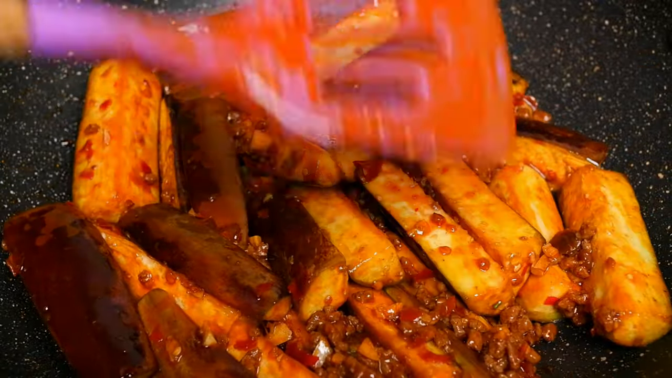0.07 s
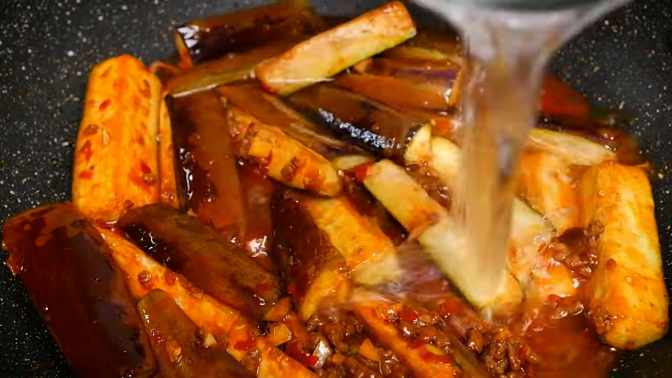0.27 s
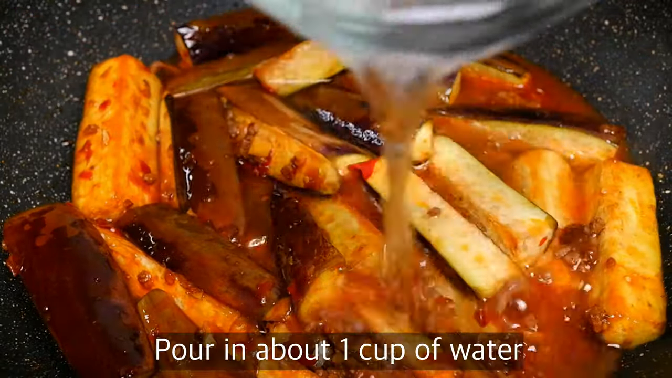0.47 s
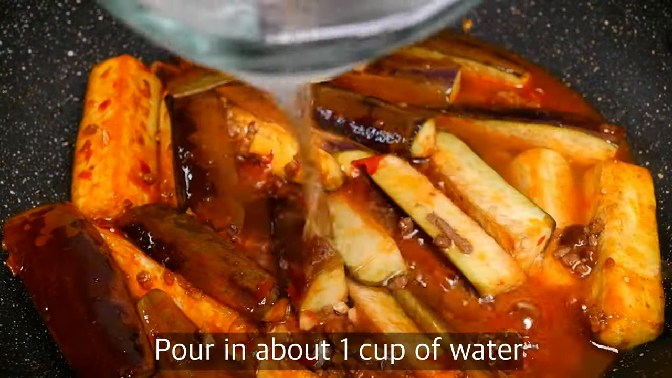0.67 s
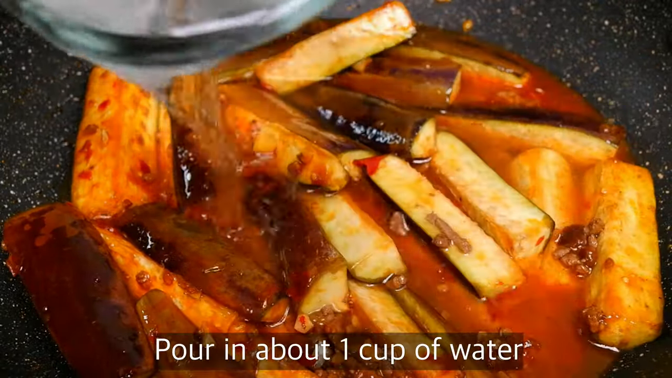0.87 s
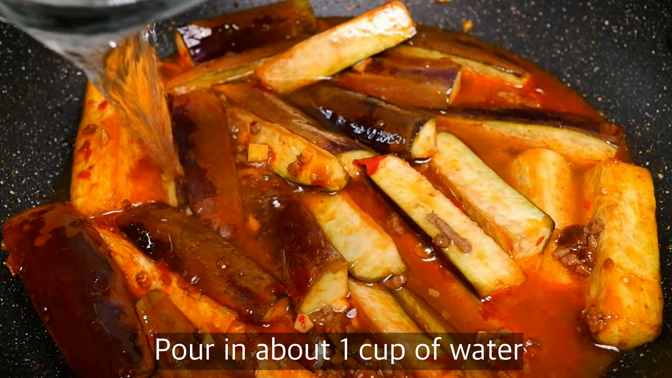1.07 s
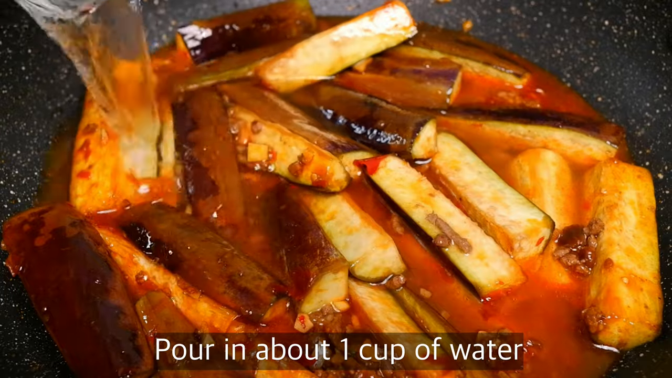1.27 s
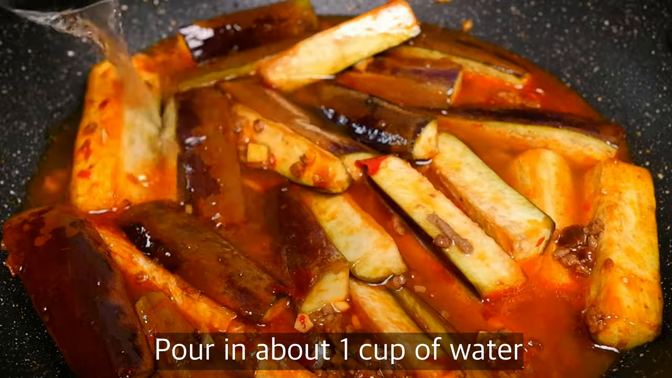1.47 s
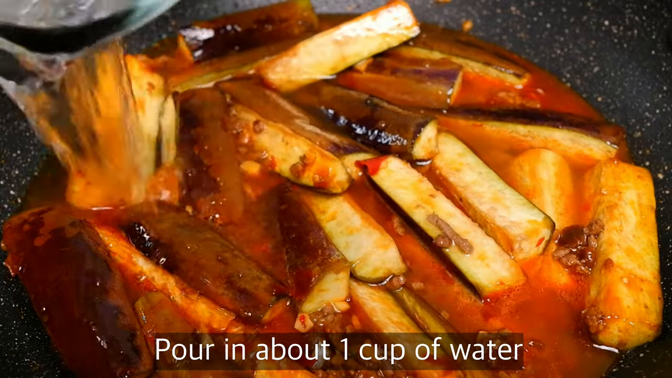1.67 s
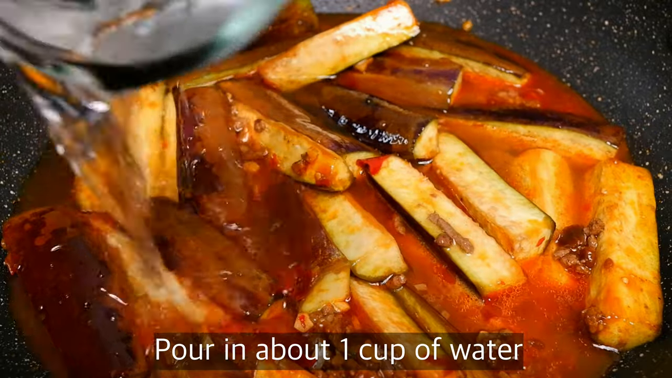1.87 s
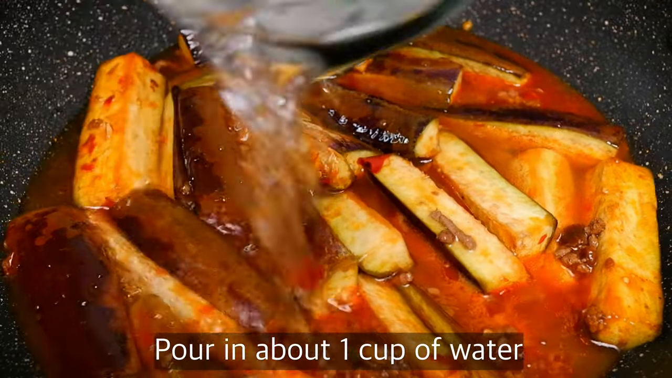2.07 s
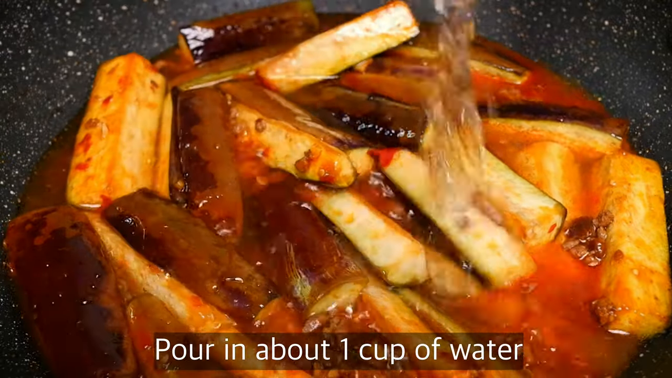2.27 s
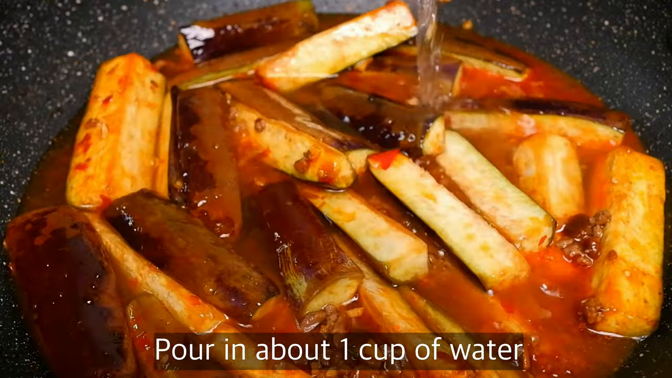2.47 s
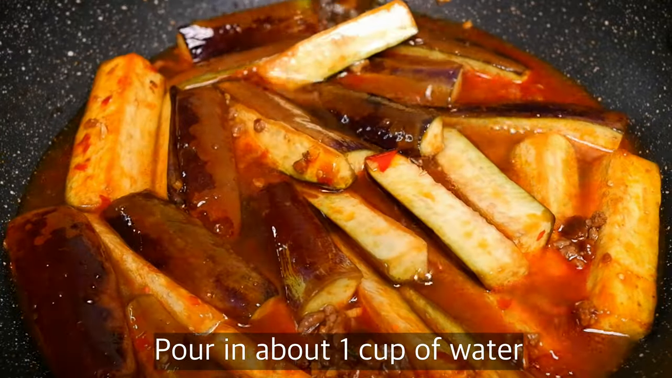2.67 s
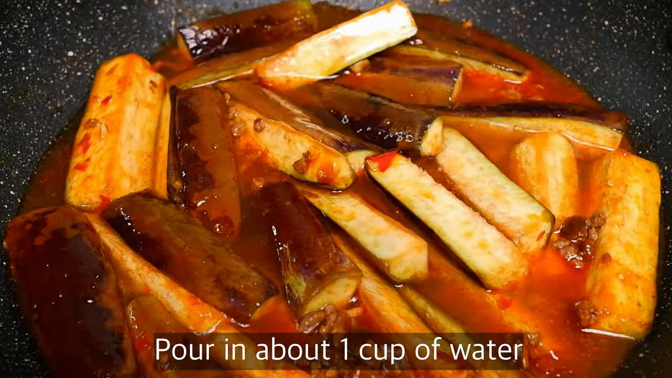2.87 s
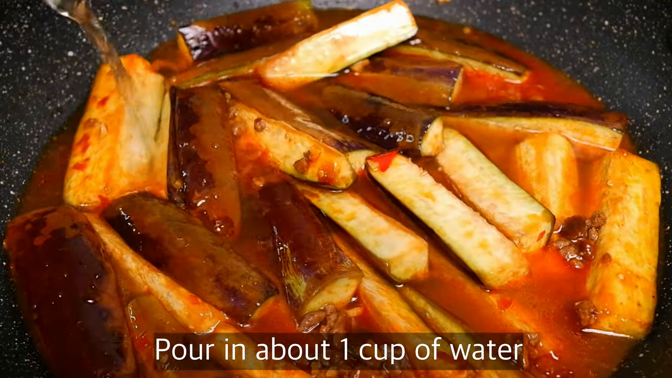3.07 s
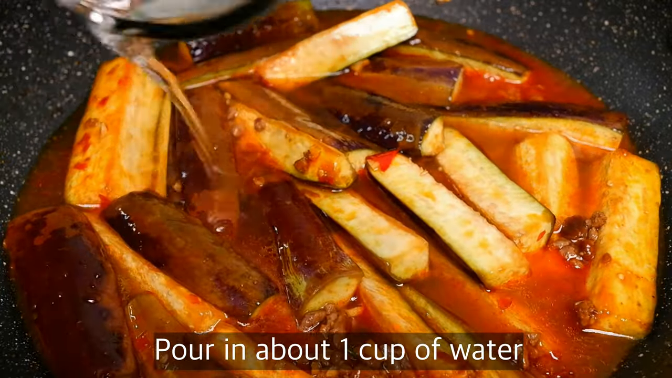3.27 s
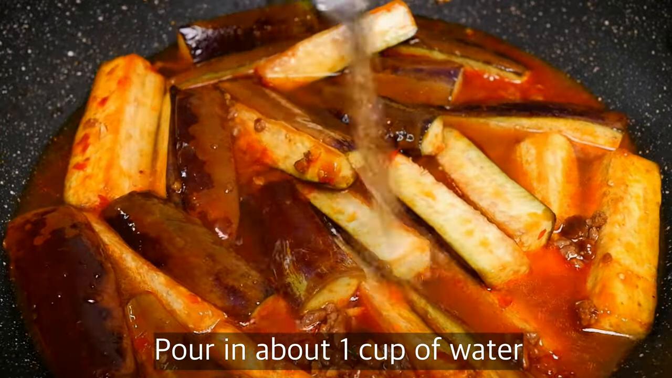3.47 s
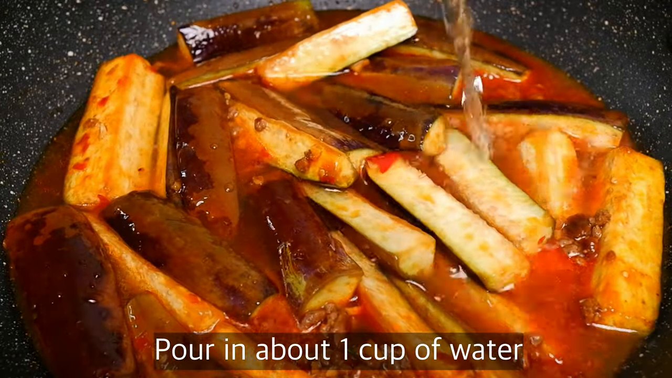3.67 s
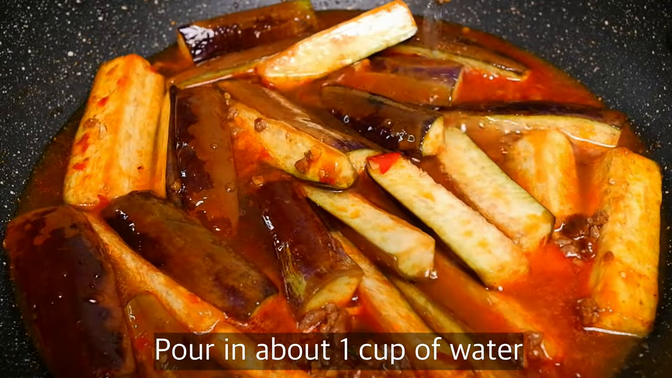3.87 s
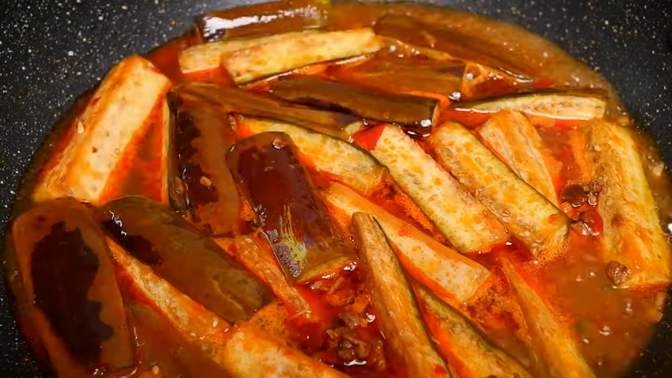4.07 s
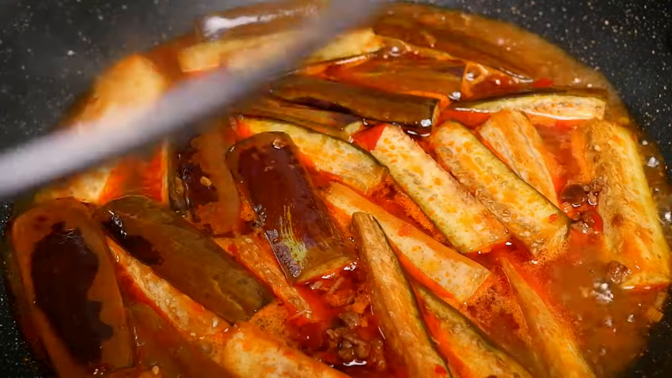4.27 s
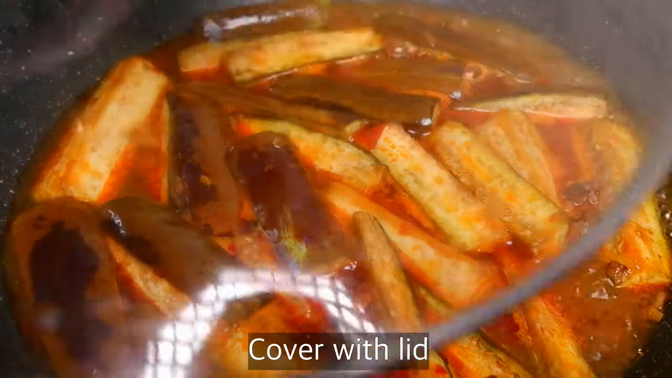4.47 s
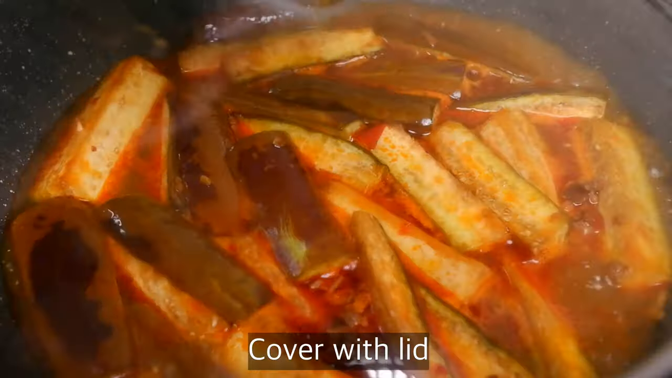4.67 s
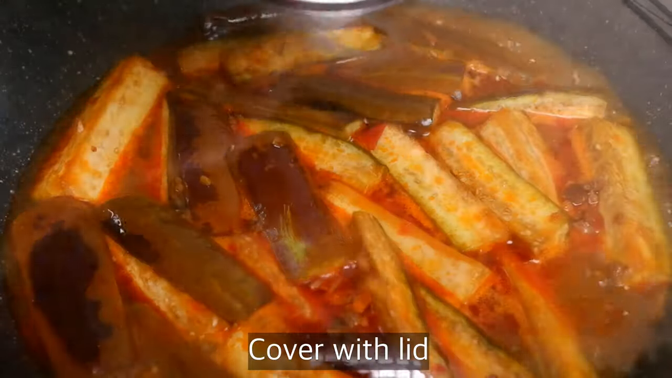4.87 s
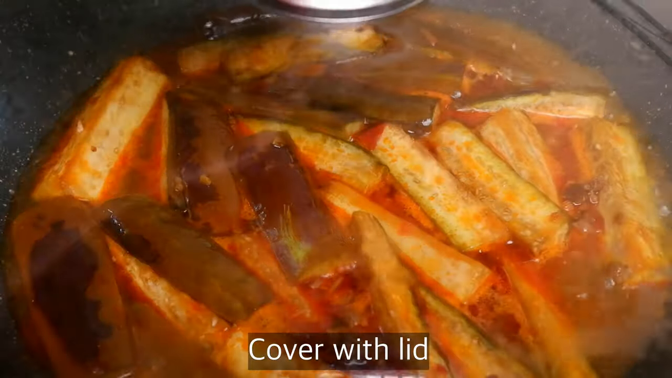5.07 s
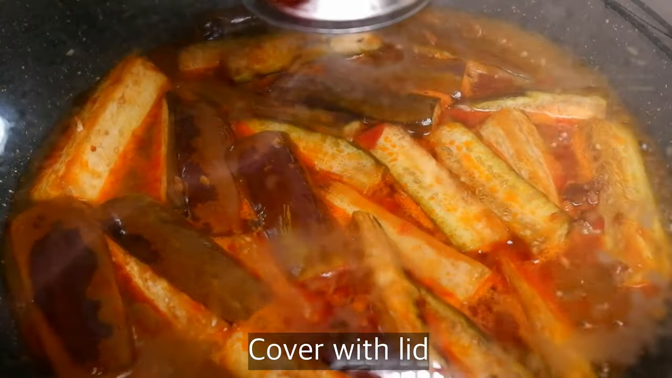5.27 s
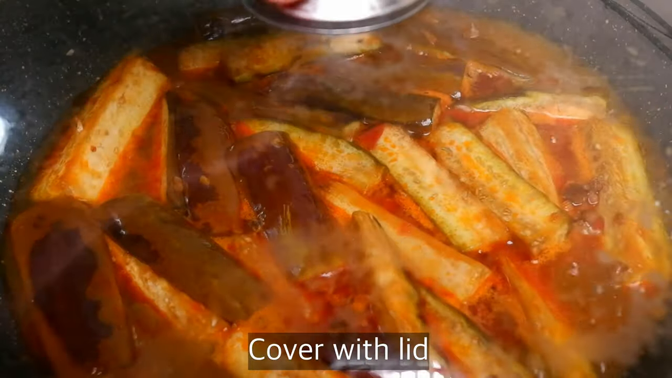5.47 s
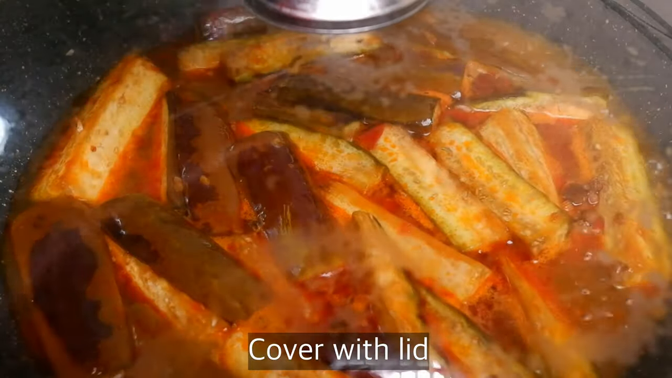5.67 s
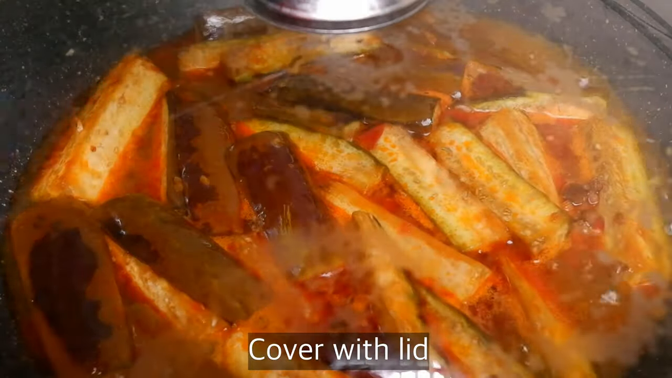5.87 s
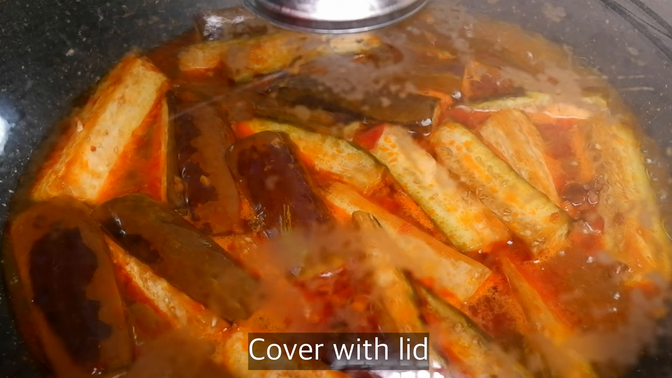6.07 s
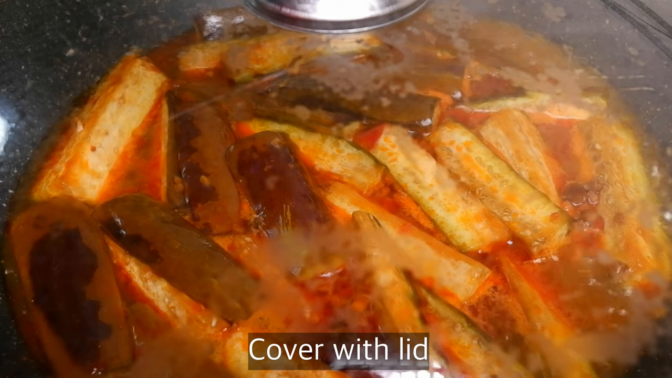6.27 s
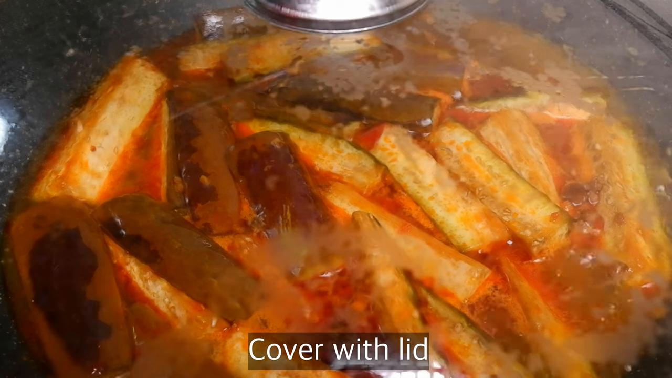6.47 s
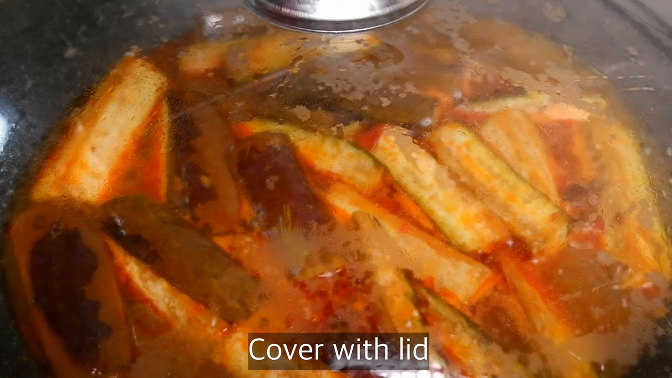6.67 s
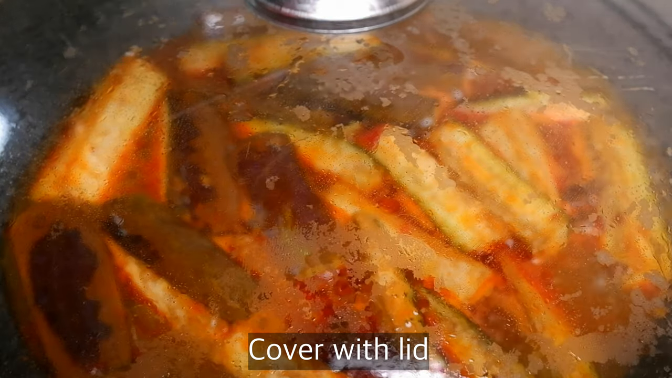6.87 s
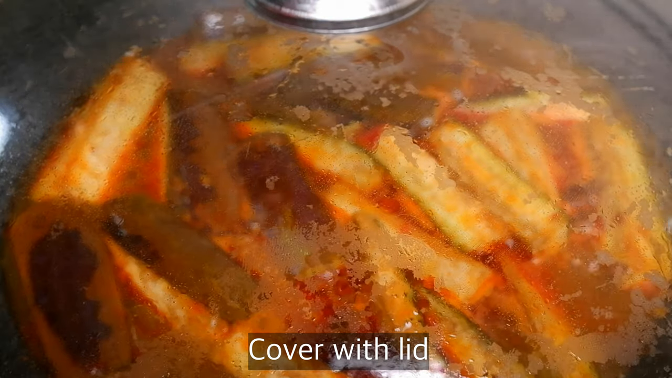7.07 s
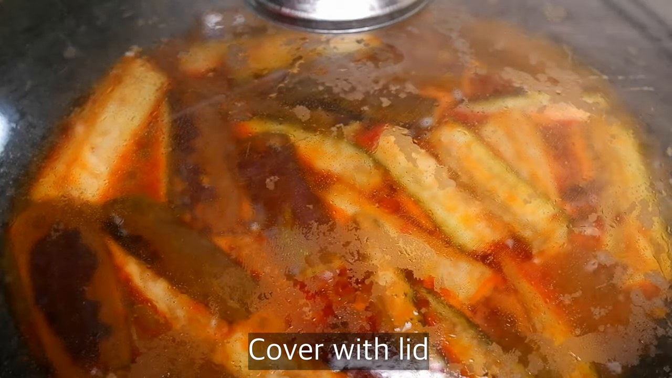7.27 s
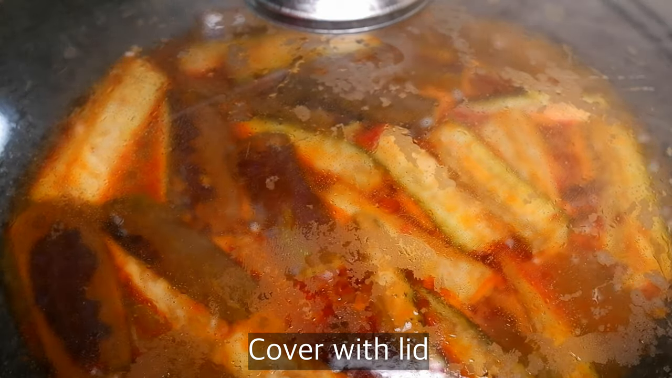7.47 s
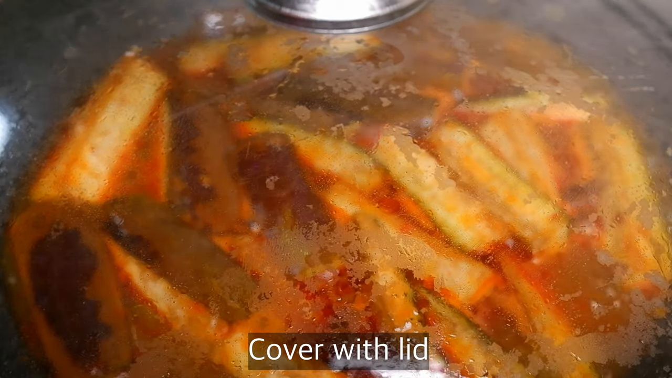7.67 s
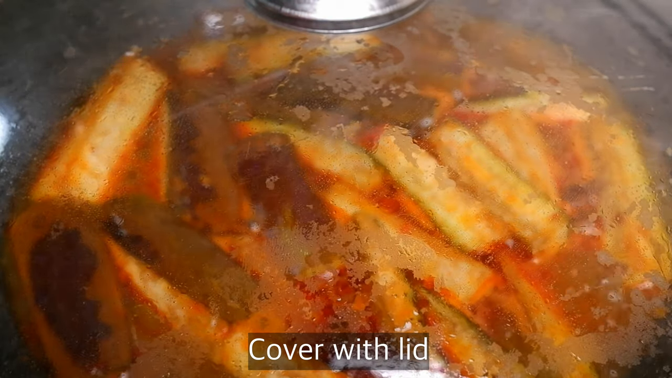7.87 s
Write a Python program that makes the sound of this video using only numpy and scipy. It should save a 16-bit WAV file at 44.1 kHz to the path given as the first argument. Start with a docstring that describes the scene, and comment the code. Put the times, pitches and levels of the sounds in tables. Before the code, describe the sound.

Close up in a small kitchen, food fries in a hot pan with a bright fizz and scattered pops. Poured water splashes and hisses, and the sizzle slowly weakens. About halfway through, it suddenly gives way to softly simmering sauce. A glass lid rattles against the rim and settles with one firm knock, shutting in the fizz. Dull bubbling carries on over the steady hum of a hob fan.

```python
"""Aubergine sizzles in a wok as its water flashes to steam in hot oil, over the hum of the hob's cooling fan.
A cup of water is poured in: it gurgles, raises steam and calms the frying. Then the sauce simmers
while a glass lid knocks on the rim, slides and drops into its seat, shutting in the fizz.
Three moments follow each other abruptly, heard from close by in a small kitchen."""
import sys
import numpy as np
from scipy import signal
from scipy.fft import rfft, irfft
from scipy.io import wavfile

SR = 44100
rng = np.random.default_rng(int(sys.argv[2]) if len(sys.argv) > 2 else 0)


def unload_wav(signal):
    """Save mono or channel-first audio to the path in sys.argv[1] as 16-bit WAV at rate SR, clipped to [-1, 1]."""
    wavfile.write(
        sys.argv[1],
        SR,
        np.round(np.clip(np.atleast_2d(signal).T, -1, 1) * 32767).astype(np.int16),
    )


N = 349708
TIME = np.arange(N) / SR

# jumps to the next moment, first the pouring, then the simmering: (time [s])
JUMPS = [0.300, 4.104]
# tone of the fine fizz: (frequency [Hz], level [dB])
FIZZ_TONE = [(1200, -15.5), (2200, -5), (3200, -3), (4000, -3), (5000, -5.5), (6500, -3), (9500, -5.5),
             (11200, -9.5), (15500, -14)]
# tone of the coarser spitting: (frequency [Hz], level [dB])
SPIT_TONE = [(300, -21.5), (550, -5), (700, -3.5), (880, -0.5), (1050, -1.5), (1300, -1.5), (1750, -2),
             (2200, 1.5), (2900, -6), (5000, -30)]
# hollow ringing of the wok: (pitch [Hz], width [Hz], level [dB])
WOK_RINGS = [(880, 170, -14), (2370, 60, -21), (2935, 30, -10), (3220, 32, -11), (4280, 62, -4),
             (4950, 540, -4.5), (5760, 160, -3), (6320, 45, -6), (8400, 70, -9), (9100, 60, -14),
             (10900, 100, -25)]
# bursting drops and bubbles: (time [s], peak [dB], pitch [Hz], width [share of pitch], fade time [s])
POPS = [(.004, -26, 860, 0.27, 0.0035), (.019, -26, 3500, 1.8, .0015), (.091, -19, 6000, 1.5, .0003),
        (0.189, -21, 6930, 1.3, 0.00042), (.2225, -25, 5000, 2, .0006), (0.286, -14, 2500, 1.8, .0012),
        (0.623, -16.5, 3000, 1.6, 0.0014), (.684, -15, 2400, 3.1, 0.0025), (0.7065, -17.5, 4500, 1.8, .001),
        (.873, -25, 4500, 1.5, .0005), (.960, -28, 1210, 0.72, 0.0069), (1.078, -18.5, 4000, 3.7, 0.0028),
        (1.47, -32, 2000, 1, 0.0055), (1.774, -31, 2050, 0.66, 0.0013), (2.14, -27, 4250, 0.085, 0.0044),
        (2.1704, -19, 1100, 2.6, 0.0016), (2.219, -21.5, 3300, 0.83, 0.0029),
        (2.228, -24.5, 3600, 0.55, 0.0022), (2.265, -25, 3800, 0.3, .0013),
        (2.347, -25.5, 2250, 0.39, 0.0024), (2.472, -27, 2900, 0.46, .0015), (2.492, -33, 1080, 0.33, .005),
        (2.659, -34, 950, 0.7, 0.004), (2.946, -25, 1700, 1.6, .0012), (3.103, -22, 5400, 0.95, 0.00072),
        (3.189, -26, 2350, 0.94, 0.0015), (3.5531, -23, 1260, 2.8, 0.002), (3.555, -28, 7500, 0.7, 0.0017),
        (3.660, -30, 4500, 1.5, .001), (3.678, -37, 2350, 0.16, 0.009), (3.747, -30, 1900, 0.63, .002),
        (3.755, -30, 4200, 0.84, .0006), (3.770, -25, 2800, 1.5, .0004), (3.887, -28.5, 1000, 1.1, 0.0017),
        (4.0259, -12, 6660, 1.5, 0.00076), (4.36, -50, 1180, 0.3, .003), (5.612, -41, 1110, 0.21, 0.0036),
        (5.976, -43, 1090, .3, 0.0037), (6.564, -46, 1110, .3, .003), (7.208, -42, 9450, .25, .004),
        (7.516, -41, 1130, 0.36, .003), (7.767, -41, 1100, 0.16, 0.0033)]
# tone of the fan during the frying: (frequency [Hz], level [dB])
FAN_FRYING_TONE = [(25, -25), (60, -12), (100, -6.5), (145, 3.5), (200, 1.5), (280, -1), (400, -2),
                   (520, -9), (800, -25.5), (2000, -40)]
# tone of the fan during the simmering: (frequency [Hz], level [dB])
FAN_SIMMER_TONE = [(25, -55), (60, -10.5), (110, -7), (155, 2), (240, 2), (350, 0.5), (450, -2.5), (540, 0),
                   (660, -14.5), (900, -15), (2000, -60)]
# the low hum swells once: (time [s], half length [s], level [dB])
HUM_SWELL = [(2.62, 0.25, -48.5)]
# the fan's droning notes during the simmering: (pitch [Hz], width [Hz], level [dB])
FAN_DRONES = [(160.9, 4.6, -59), (243, 16, -57), (291.5, 10.4, -59), (413.4, 9.6, -58.5), (472.5, 8.3, -61)]
# pours from the cup: (start [s], length [s], flow [dB])
POURS = [(0.45, 2.83, 0), (3.41, 0.74, 1)]
# gushes in the stream: (time [s], half length [s], added flow [dB])
GUSHES = [(0.98, 0.052, 10.5), (1.47, 0.067, 1), (2.55, 0.22, -10), (3.15, 0.11, -17)]
# water meets bare hot metal and flares into steam: (time [s], half length [s], strength [dB])
FLARES = [(0.8, 0.34, 2.5), (2.58, 0.49, 0)]
# narrow bands of hiss from the running hob: (pitch [Hz], width [Hz], level [dB])
HOB_HISS = [(5840, 280, -79), (6510, 130, -71), (6870, 140, -62), (7154, 400, -60), (7530, 150, -74),
            (8200, 450, -77)]
# tone of the sauce under the glass: (frequency [Hz], level [dB])
SIMMER_TONE = [(400, -12), (800, -10), (1050, 2), (1200, 2), (1400, -6.5), (1700, -5), (1950, -11),
               (2500, -5.5), (2950, -18), (4000, -19), (5000, -16.5), (8500, -17), (12500, -25.5),
               (15000, -25)]
# bright ticks escape as the lid comes down: (time [s], half length [s], level [dB])
LEAK_TICKS = [(4.75, 0.25, -61)]
# the lid hits the rim; the thump of air tends to get lower as the gap closes:
# (time [s], ring [dB], contact time [ms], crack [dB], thump [dB], thump pitch [Hz])
KNOCKS = [(4.9828, -19.5, 0.12, -27.5, -12.5, 359), (4.9878, -12.5, 0.12, -24.5, -37, 388),
          (5.023, -24, 0.18, -41, -32, 385), (5.164, -26, 0.17, -53, -35, 258),
          (5.1846, -35, 0.15, -42, -18.5, 325), (5.2200, -25, 0.14, -35.5, -21, 363),
          (5.226, -29.5, 0.083, -34, -20, 285), (5.234, -31, 0.11, -41, -38, 250),
          (5.243, -32, 0.22, -40, -29, 235), (5.262, -38, .2, -50, -29, 280),
          (5.271, -22, 0.19, -46, -23, 294), (5.283, -40, 0.23, -47, -26, 250),
          (5.3250, -28, 0.44, -49, -20, 271), (5.352, -38, .3, -49, -23, 215),
          (5.3756, -3, 0.21, -26, -13, 307), (5.3811, -34, 0.3, -32, -15, 213)]
# ringing notes of the lid on the pan: (pitch [Hz], level [dB], time to fade by 60 dB [s])
LID_NOTES = [(163.5, -40, 1), (199.4, -41.5, 1), (289.4, -50, 0.2), (484, -17.5, 0.019), (836, -16, .017),
             (1000, -20, .02), (1130, -42, 0.25), (1159, 0.5, 0.029), (1240, -28.5, 0.29), (1400, -15, .02),
             (1800, -14, .025), (2320, -27, 0.01), (3050, -4.5, 0.016), (4560, -22, .02), (4920, -20, .02)]
# tone of each knock's brief crack: (frequency [Hz], level [dB])
CRACK_TONE = [(400, -20), (1300, 3), (2000, 1.5), (3500, -2), (5000, 0), (9000, -6), (12000, -11),
              (15000, -19)]
# the lid slides, shudders and settles: (start [s], length [s], level [dB])
RUBS = [(4.99, 0.28, -46), (5.22, 0.12, -47), (5.42, 0.074, -50)]
# tone of its dull grinding on the pan: (frequency [Hz], level [dB])
GRIND_TONE = [(90, 10), (160, 3), (290, -2), (450, -3), (650, -4), (820, -4), (1000, -18), (1220, 0),
              (1450, -11), (2000, -16), (3000, -17), (6000, -38), (12000, -46)]
# tone of the kitchen's echo: (frequency [Hz], level [dB])
ECHO_TONE = [(80, -20), (190, 4), (400, 0), (650, -2), (1150, -1), (3000, -2), (12000, -7)]
# tone of the faint hiss that sets left and right apart: (frequency [Hz], level [dB])
FAINT_HISS_TONE = [(30, 5), (700, 10.5), (1300, -2.5), (4000, -6.5), (8000, -23.5), (14000, 6)]


def gain(db):
    """Turn decibels into a number to multiply a sound by."""
    return 10 ** (np.asarray(db) / 20)


def unit(x):
    """Scale a sound so that its average strength (rms) is 1."""
    return x / np.sqrt(np.mean(x ** 2))


def colour(x, tone, size=4096):
    """Filter a sound so that its lows and highs follow a tone table."""
    hz, db = np.transpose(tone)
    outline = np.interp(np.log(np.fft.rfftfreq(size, 1 / SR) + 1), np.log(hz), db)
    # these steps make a filter that never answers before the sound arrives
    cepstrum = irfft(np.log(gain(outline)))
    cepstrum[1:size // 2] *= 2
    cepstrum[size // 2 + 1:] = 0
    return signal.oaconvolve(x, irfft(np.exp(rfft(cepstrum))))[:len(x)]


def resonate(x, hz, width):
    """Let through a band around one pitch; its width is in Hz."""
    return signal.lfilter(*signal.iirpeak(min(hz, SR / 3), hz / min(width, SR / 3), fs=SR), x)


def noise(count=N):
    """White noise: an even hiss."""
    return rng.standard_normal(count)


def wander(per_s):
    """A value that drifts at random, mostly between -1 and 1."""
    steps = noise(4096)
    return np.interp(TIME * per_s, np.arange(len(steps)), steps)


def add(out, at, sound):
    """Mix a short sound in at a time in seconds."""
    start = max(int(at * SR), 0)
    out[start:start + len(sound)] += sound[:max(N - start, 0)]


def held(rows, rise_s, fall_s):
    """A loudness curve that rises, holds and dies away for each row."""
    curve = np.zeros(N)
    for at, length, db in rows:
        rise = np.clip((TIME - at) / rise_s, 0, 1)
        fall = np.exp(-np.maximum(TIME - at - length, 0) / fall_s)
        curve += gain(db) * rise * fall
    return curve


def swells(rows):
    """A loudness curve with one smooth hump for each row."""
    return sum(gain(db) * np.exp(-((TIME - at) / half) ** 2) for at, half, db in rows)


def step(at_s, half_s):
    """A smooth change from 0 to 1 around a moment."""
    return .5 + .5 * np.tanh((TIME - at_s) / half_s)


def crackle(per_s, spread_db, flutter_db):
    """Tiny random clicks: spread makes a few stand out, flutter makes them swell in flurries."""
    clicks = (rng.random(N) < per_s / SR) * np.sign(noise())
    strengths = gain(spread_db * np.minimum(noise(), np.pi))
    return unit(clicks * strengths * gain(flutter_db * wander(70)))


def bubbles(low_hz, high_hz, cycles, spread_db, rise, count):
    """Bubbles ring briefly at random times; rise lifts their pitch as they reach the surface."""
    out = np.zeros(N)
    for when, pitch, strength in rng.random((count, 3)):
        hz = low_hz * (high_hz / low_hz) ** pitch
        age = np.arange(int(2 * cycles * SR / hz)) * hz / SR / cycles
        ring = np.sin(2 * np.pi * cycles * (age + rise * age ** 2 / 2)) * np.exp(-np.pi * age)
        add(out, when * N / SR, ring * gain(-spread_db * np.log(strength + 0.0038)))
    return unit(out)


def flow():
    """How strongly water runs from the cup: about 1 while pouring."""
    return held(POURS, rise_s=0.02, fall_s=0.022)


def heat(oil_db, wet_db, quench_db, cool_db_per_s):
    """Strength of the frying: fierce in oil, calmed by water, then fed by the stream as the pan cools."""
    quenched = step(at_s=0.65, half_s=0.4)
    db = np.where(TIME < JUMPS[0], oil_db, wet_db) - quench_db * quenched - cool_db_per_s * TIME
    starved = 0.19 * quenched * (1 - flow())  # share that stops without fresh water
    return gain(db) * (1 - starved)


def frying():
    """Water flashes to steam in hot oil: fizz, spitting and tiny ringing blisters, coloured by the wok."""
    fine = crackle(per_s=11000, spread_db=4, flutter_db=.8)
    coarse = crackle(per_s=3500, spread_db=2.5, flutter_db=1.3)
    ticks = crackle(per_s=90, spread_db=0, flutter_db=5)
    blisters = bubbles(low_hz=2300, high_hz=10000, cycles=15, spread_db=3.9, rise=0.089, count=4000)
    fizz = unit(colour(fine, FIZZ_TONE)) * gain(0.37) + blisters * gain(-11)
    fizz += unit(colour(ticks, FIZZ_TONE)) * gain(-14)
    fizz *= heat(oil_db=-30, wet_db=-34, quench_db=7.5, cool_db_per_s=0.95)
    fizz *= gain(1.5 * swells(FLARES))
    spit = unit(colour(coarse + 0.75 * fine, SPIT_TONE))
    spit *= heat(oil_db=-36, wet_db=-39.5, quench_db=6, cool_db_per_s=2.13)
    sizzle = fizz + spit
    return sizzle + sum(gain(db) * resonate(sizzle, hz, width) for hz, width, db in WOK_RINGS)


def steam():
    """Steam sings in tiny high bubbles, louder when water meets bare hot metal."""
    singing = bubbles(low_hz=4540, high_hz=5420, cycles=44, spread_db=3.5, rise=0.0076, count=3500)
    return singing * (gain(-63) + gain(-50.5) * swells(FLARES))


def fan(simmering, waver):
    """The hob's cooling fan rumbles and hums; during the simmering it wavers and drones more."""
    hum = unit(resonate(noise(), hz=154.2, width=13)) * gain(-61)
    swell = np.sin(2 * np.pi * 160.6 * TIME + 0.33 * wander(11.4)) * swells(HUM_SWELL)
    early_rumble = unit(colour(noise(), FAN_FRYING_TONE)) * gain(-51)
    late_rumble = unit(colour(noise(), FAN_SIMMER_TONE)) * gain(-49)
    drone = sum(unit(resonate(noise(), hz, width)) * gain(db) for hz, width, db in FAN_DRONES)
    return (1 - simmering) * (early_rumble + hum + swell) + simmering * (waver * late_rumble + drone)


def pops():
    """Drops burst in the oil or splash on the food, and bubbles pop: a snap and a short spray."""
    out, t = np.zeros(N), TIME[:2048]
    snap = 3 * (t == 0)
    for at, db, hz, share, fade_s in POPS:
        spray = noise(len(t)) * np.exp(-t / fade_s)
        burst = resonate(snap + spray, hz, hz * share)
        add(out, at, burst / np.abs(burst).max() * gain(db))
    return out


def kitchen(x, fade_s, echo_db):
    """Walls and cupboards add a short, dull echo that drops by 60 dB in fade_s."""
    t = TIME[:SR]
    onset = np.clip(t / 0.0026 - .5, 0, 1)
    tail = noise(SR) * gain(-60 * t / fade_s) * onset
    tail = colour(tail / np.linalg.norm(tail), ECHO_TONE)
    return x + gain(echo_db) * signal.oaconvolve(x, tail)[:N]


def pouring():
    """The stream traps bubbles in the sauce, throws drops and drums on the floor of the pan."""
    gurgle = bubbles(low_hz=844, high_hz=4000, cycles=5.5, spread_db=1.3, rise=0.14, count=2600)
    drops = bubbles(low_hz=850, high_hz=4500, cycles=1.1, spread_db=3.7, rise=0.1, count=300)
    drum = unit(resonate(resonate(noise(), hz=156, width=31), hz=156, width=31))
    stream = gurgle * gain(-57.5) + drops * gain(-63) + drum * gain(-69.5)
    return stream * (flow() + swells(GUSHES))


def hob_hiss():
    """The running hob hisses in high, narrow bands that each flicker in level."""
    out = np.zeros(N)
    for hz, width, db in HOB_HISS:
        band = unit(resonate(resonate(noise(), hz, width), hz, width))
        out += band * gain(db + 1.6 * wander(25))
    return out


def simmer():
    """Sauce boils dully under the glass and larger bubbles blub; the fizz fades as the gap closes."""
    boil = crackle(per_s=5000, spread_db=4, flutter_db=.8)
    fizz = crackle(per_s=9000, spread_db=5, flutter_db=.8)
    ticks = bubbles(low_hz=7000, high_hz=13000, cycles=16, spread_db=2.2, rise=0, count=2600)
    blubs = bubbles(low_hz=950, high_hz=2600, cycles=9, spread_db=1.5, rise=.08, count=200)
    gap = 1 - step(at_s=5.4, half_s=0.17)  # 1 while the lid is open, 0 once it is shut
    leak = gain(-87) + gain(-53) * gap
    bright = unit(colour(fizz, FIZZ_TONE)) * gain(-5) + ticks * gain(-17)
    dull = unit(colour(boil, SIMMER_TONE)) * gain(-54 + 2 * gap)
    dull += unit(colour(blubs, SIMMER_TONE)) * gain(-62.5)
    return dull + bright * leak + ticks * swells(LEAK_TICKS)


def lid():
    """Each knock cracks, rings glass and pan and thumps the air between them; the sliding rim grinds."""
    out, t = np.zeros(N), TIME[:SR // 2]
    fade = -np.log(1000) * t  # exp(fade / x) drops by 60 dB in x seconds
    notes = [gain(db) * np.sin(2 * np.pi * hz * t) * np.exp(fade / ring_s) for hz, db, ring_s in LID_NOTES]
    squeeze = 1 - np.exp(-t / 0.0013)  # trapped air takes a moment to compress
    thud = gain(-29) * np.sin(2 * np.pi * 110 * t) * np.exp(fade / 0.06)  # the wok rocks on the hob
    for at, ring_db, contact_ms, crack_db, thump_db, thump_hz in KNOCKS:
        ring = gain(-noise(len(notes))) @ notes  # each spot on the rim favours other notes
        push = t * np.exp(-1000 * t / contact_ms)  # a longer contact sounds duller
        ring = signal.fftconvolve(ring, push / push.sum())[:len(t)]
        crack = colour(noise(len(t)), CRACK_TONE) * np.exp(fade / .036)
        thump = np.sin(2 * np.pi * thump_hz * t) * np.exp(fade / 0.027) * squeeze
        add(out, at, gain(thump_db) * (thump + thud) + gain(ring_db) * ring + gain(crack_db) * crack)
    grind = unit(colour(crackle(per_s=1400, spread_db=3.5, flutter_db=0), GRIND_TONE))
    out += grind * held(RUBS, rise_s=0.014, fall_s=0.097)
    # so small a body gives off little bass
    return signal.sosfilt(signal.butter(3, 125, "high", fs=SR, output="sos"), out)


def scene():
    """First the open pan, then the simmering and the lid; the sound dips briefly at each jump in time."""
    simmering = (TIME > JUMPS[1]) * 1.
    dips = np.prod([np.clip(np.abs(TIME - at) / 0.006, 0, 1) for at in JUMPS], axis=0)
    open_pan = frying() + pouring() + steam()
    covered_pan = simmer() + kitchen(lid(), fade_s=0.35, echo_db=-6)
    close_pops = kitchen(pops(), fade_s=.07, echo_db=-11)
    waver = gain(.7 * wander(9))  # shared by the fan's rumble and the hob's hiss
    hob = fan(simmering, waver) + simmering * waver * hob_hiss()
    sound = dips * ((1 - simmering) * open_pan + simmering * covered_pan + close_pops + hob)
    return np.array([sound, sound])


def record(dry):
    """Add a faint hiss, opposite in left and right, and cut the treble above 15850 Hz."""
    hiss = unit(colour(noise(), FAINT_HISS_TONE)) * gain(-63)
    treble_cut = signal.ellip(10, .2, 70, 15850, fs=SR, output="sos")
    return signal.sosfilt(treble_cut, dry + np.array([hiss, -hiss]))


dry = scene()
out = record(dry)
unload_wav(out)
```